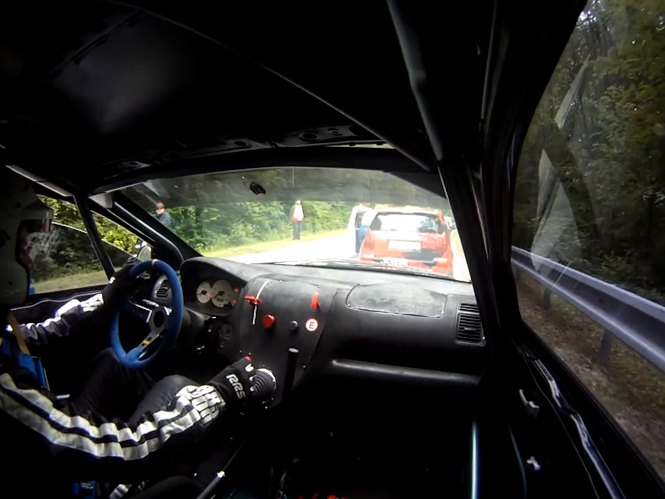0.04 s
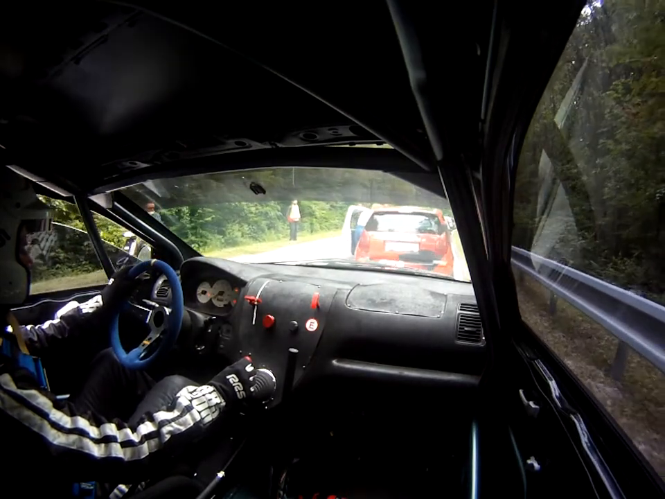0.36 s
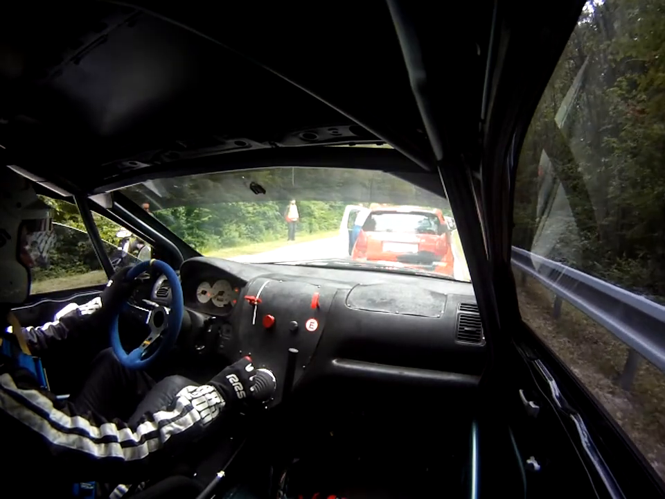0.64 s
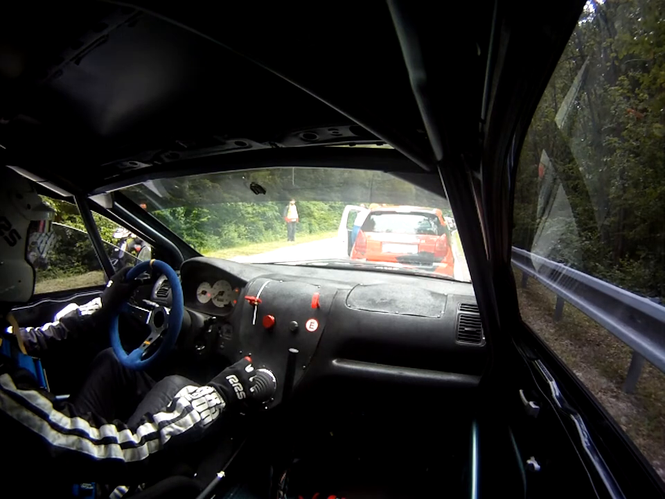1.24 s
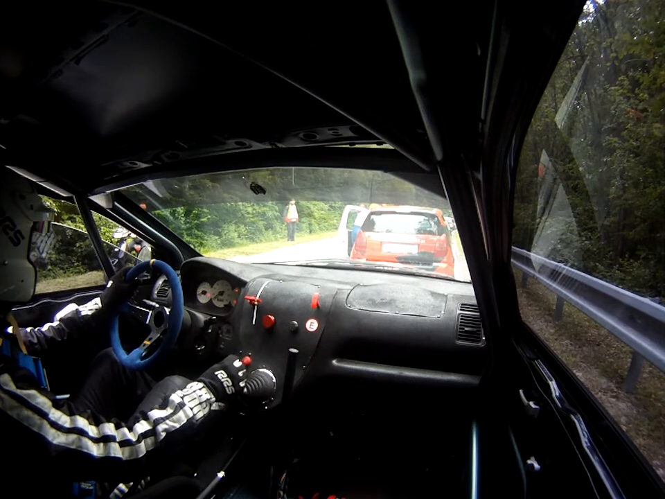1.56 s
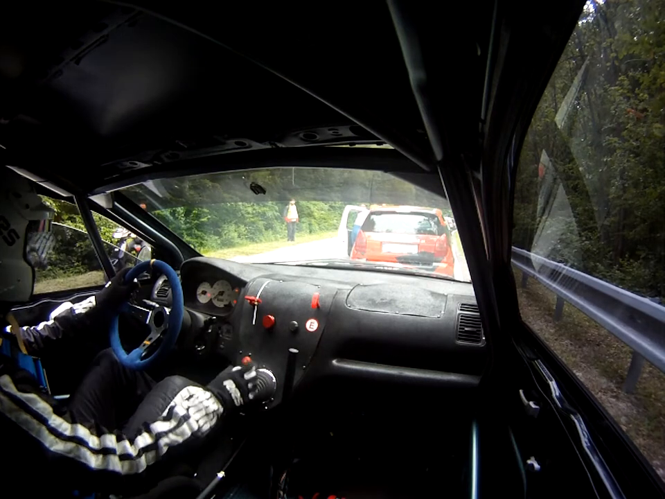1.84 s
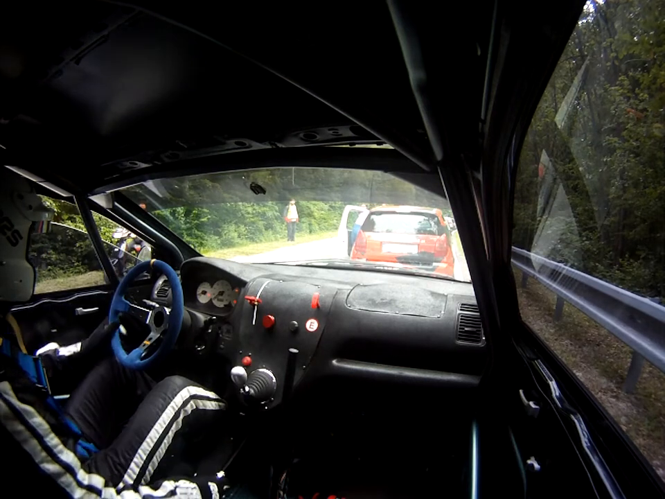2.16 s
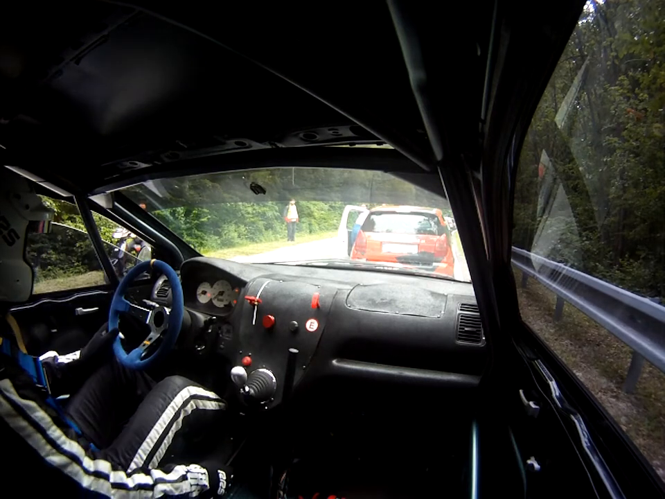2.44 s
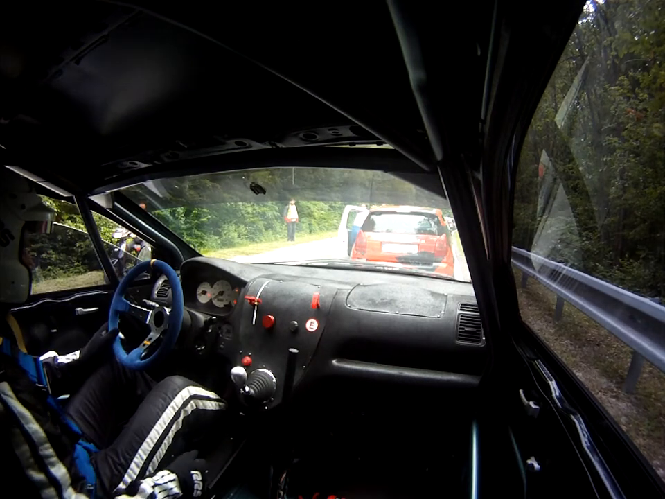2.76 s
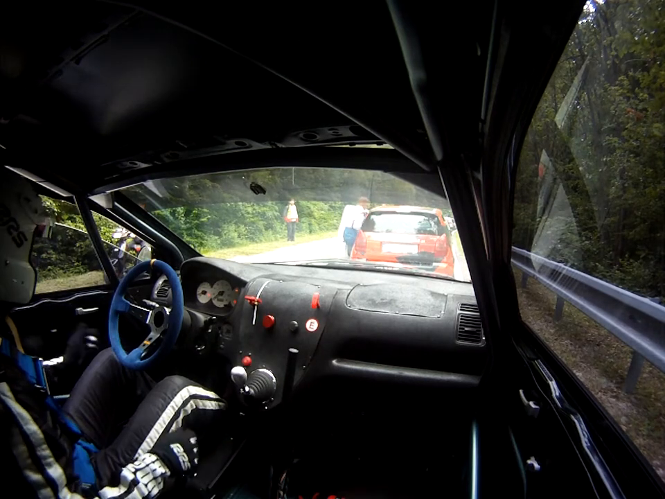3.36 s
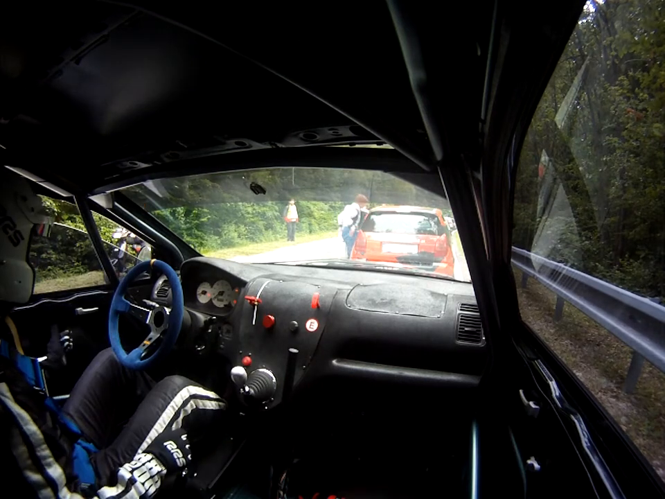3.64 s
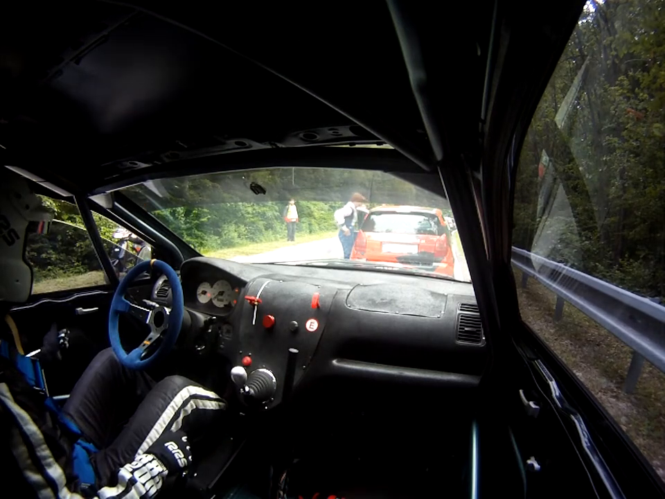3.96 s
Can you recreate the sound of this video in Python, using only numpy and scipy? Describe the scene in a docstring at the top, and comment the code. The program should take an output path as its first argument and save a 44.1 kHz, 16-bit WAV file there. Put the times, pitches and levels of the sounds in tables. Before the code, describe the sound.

A handbrake ratchets up quickly inside a rally car with its engine idling.

```python
"""An idling engine throbs inside a stripped rally car; a fan hums and an exhaust murmurs from up the road.
The driver pulls the handbrake: a pawl drops over fourteen teeth, ringing the lever and floor pan,
and the cable groans. The lever knocks as it is let go, and he shifts in his seat.
The onboard recorder holds each sample of a slow clock, which mirrors the sound into a gritty treble."""
import sys
import numpy as np
from scipy import signal
from scipy.fft import rfft, irfft
from scipy.io import wavfile

SR = 44100
rng = np.random.default_rng(int(sys.argv[2]) if len(sys.argv) > 2 else 0)


def wav_out(sig):
    """Save sig, one row per channel (or a flat mono array), as 16-bit PCM at SR to the path in sys.argv[1]."""
    wavfile.write(sys.argv[1], SR, np.round(np.clip(np.atleast_2d(sig).T, -1, 1) * 32767).astype(np.int16))


N = 176400
T = np.arange(N) / SR

# exhaust murmur, engine clatter (time [s], level [dB])
EXHAUST_LEVEL = [(0, -40.5), (.5, -39), (.95, -39.5), (1.15, -48), (1.32, -50.5), (1.4, -40), (1.56, -48),
                 (2.4, -53.5), (4, -50.5)]
CLATTER_LEVEL = [(0, -51), (.85, -51.5), (1.15, -53), (2.5, -52), (4, -52.5)]
# idle speed (time [s], crank rate [rev/s])
CRANK_SPEED = [(0, 12.86), (1.4, 13.11), (2.2, 13.1), (3.5, 12.87), (4, 13.2)]
# engine tones (order [per rev], level [dB])
ENGINE_ORDERS = [(2, -31.5), (3, -57), (4, -48.5), (8, -50), (10, -57), (14, -53.5), (16, -39.5),
                 (26, -66.5), (44, -61.5)]
# body shell booms (start [s], length [s], level [dB], pitch [Hz])
SHELL_BOOMS = [(0, 0.083, -32.5, 40.6), (0.021, 0.091, -35, 116.7), (0.216, 0.094, -25.5, 32.9),
               (0.314, .1, -32, 46.1), (0.48, 0.13, -29.5, 34.1)]

# swells (start [s], length [s], level [dB])
EXHAUST_BLIPS = [(.72, 0.356, -46), (1.35, 0.152, -40.5)]
CLOTH_RUBS = [(1.475, .05, -54), (2.585, .11, -38.5), (3.54, 0.036, -46.5), (3.61, 0.089, -50.5),
              (3.915, 0.11, -42)]  # sleeve and seat
GEAR_LEVER_SCUFFS = [(1.64, 0.058, -47.5), (1.68, 0.032, -51)]
CABLE_GROANS = [(2.72, 0.12, -33), (2.93, .11, -40.5)]

# impacts (time [s], level [dB])
LIGHT_TICKS = [(1.499, -62), (1.902, -57), (2.599, -53)]
DULL_KNOCKS = [(3.1553, -32), (3.1615, -27), (3.176, -37), (3.94, -46), (3.9675, -37), (3.991, -39)]  # lever, then seat
PAWL_DROPS = [(2.6689, -21.5), (2.6862, -23), (2.703, -22.5), (2.722, -22.5), (2.7422, -21), (2.764, -25),
              (2.7891, -22), (2.8182, -23), (2.8466, -22.5), (2.8753, -22.5), (2.9024, -23), (2.9318, -23),
              (2.9634, -23), (3.0037, -24)]

# noise and impact spectra (frequency [Hz], relative density [dB])
EXHAUST_SPECTRUM = [(90, -2), (150, 1.5), (250, -1), (335, 2.5), (390, -3.5), (510, -0.5), (620, -18.5),
                    (900, -24.5), (2000, -24)]
CLATTER_SPECTRUM = [(500, -3.5), (760, -3), (1000, -6.5), (1230, -1.5), (1530, -5.5), (1900, 1.5),
                    (2250, -1.5), (2850, 2.5), (3400, -7.5), (4150, -16), (4700, -12.5), (5400, -19),
                    (5900, -24)]
RUMBLE_SPECTRUM = [(20, -7), (45, -9), (62, -14), (85, -1), (110, 7.5), (135, 0.5), (165, 0.5),
                   (280, -12.5), (400, -7.5), (560, -2.5), (700, -19), (1000, -42.5)]
RUB_SPECTRUM = [(300, 11), (600, 8.5), (900, -13), (1300, 0), (1900, -4.5), (2700, 4.5), (3600, -6.5),
                (5500, -26)]
SCUFF_SPECTRUM = [(600, 0), (850, -2), (1200, 4), (1700, -8), (2150, 2), (3000, -5), (3600, -9.5),
                  (5500, -30)]
TICK_SPECTRUM = [(1500, -20), (3000, 4), (4500, -2), (5800, -5)]
KNOCK_SPECTRUM = [(50, 6), (120, -2.5), (330, -1), (490, 1), (610, -3.5), (900, -20), (1550, -17.5),
                  (2200, -22), (2650, -14), (3500, -26.5), (5500, -43.5)]
FLOOR_PAN_SPECTRUM = [(100, -5), (165, 2), (280, -13.5), (410, -5), (630, -2), (900, -24), (1340, -15),
                      (1550, 0), (1740, -8), (2200, -4), (2500, 1.5), (3050, -3.5), (3250, -8.5),
                      (3620, -17.5), (3850, -2.5), (4080, -17), (4650, -9.5), (5300, -16), (5900, -26)]

# cabin decay (frequency [Hz], T60 [s])
CABIN_DECAY = [(150, 0.64), (500, 0.33), (1400, .19), (2700, .21), (4000, 0.21)]
# toothed plate and lever modes (frequency [Hz], rms over the pull [dB])
LEVER_RING = [(391, -40), (425, -43), (2348, -39), (2520, -38), (2581, -41), (2640, -38), (3067, -41),
              (3102, -43)]
# pawl modes (frequency [Hz], gain [dB], T60 [s])
PAWL_RING = [(1500, 0, .04), (1590, 6, .05)]

ATTACK_S = .0014
ROOF_ECHO_S, ROOF_ECHO_DB = .0145, -6
FAN_HZ, FAN_DB = 244.1, -36
ORDER_FLUTTER_DB, CLATTER_THROB, RUMBLE_DB = 3.54, 0.083, -47.5
CHATTER_PER_S, CHATTER_DB = 260, -42
PAN_GAIN_DB, PAN_FADE_RAD, SLACK_TILT_DB_PER_OCT = 1, 1.24, 0.67
SOFT_LIMIT, HOLD_HZ, CUTOFF_HZ = .42, 12000, 15350


def from_db(db):
    """Decibels to gain."""
    return 10 ** (np.asarray(db) / 20)


def unit_rms(x):
    """Scale to rms 1."""
    return x / np.sqrt(np.mean(x ** 2) + 1e-20)


def at_hz(points, hz):
    """Read a table on a log-frequency axis."""
    table_hz, values = np.transpose(points)
    return np.interp(np.log(np.maximum(hz, 1)), np.log(table_hz), values)


def gain_curve(points):
    """Gain along (time [s], level [dB]) points."""
    return from_db(np.interp(T, *np.transpose(points)))


def colour(x, spectrum):
    """Minimum-phase filter; falls 24 dB per octave beyond the spectrum's ends."""
    n = len(x)
    hz = np.arange(n // 2 + 1) * SR / n + 1
    skirts = np.minimum(1, np.minimum(hz / spectrum[0][0], spectrum[-1][0] / hz)) ** 4
    cepstrum = irfft(np.log(from_db(at_hz(spectrum, hz)) * skirts), n)
    causal = np.r_[cepstrum[0], 2 * cepstrum[1:n // 2]]
    return irfft(rfft(x) * np.exp(rfft(causal, n)), n)


def noise(spectrum):
    """Coloured noise, rms 1."""
    return unit_rms(colour(rng.standard_normal(N), spectrum))


def drift(corner_hz):
    """Low-passed random drift, mean 0, rms 1."""
    hz = np.arange(N // 2 + 1) * SR / N
    slow = irfft(rfft(rng.standard_normal(N)) / (1 + (hz / corner_hz) ** 2), N)
    return unit_rms(slow - slow.mean())


def wandering_phase(hz, wander, corner_hz):
    """Phase [rad] of a rate that drifts by the rms fraction `wander`."""
    return 2 * np.pi * np.cumsum(hz * (1 + wander * drift(corner_hz))) / SR


def tone(hz, wander, corner_hz=27):
    """Sine of wavering pitch, rms 1."""
    return np.sqrt(2) * np.sin(wandering_phase(hz, wander, corner_hz))


def impulses(rows):
    """One impulse per (time [s], level [dB]) row."""
    time_s, db = np.transpose(rows)
    return np.bincount(np.clip(time_s * SR, 0, N - 1).astype(int), from_db(db), N)


def swells(rows):
    """One half-sine envelope per (start [s], length [s], level [dB]) row."""
    return sum(from_db(db) * np.sin(np.pi * np.clip((T - start_s) / length_s, 0, 1))
               for start_s, length_s, db in rows)


def ring(hz, t60_s, rise_s=ATTACK_S):
    """One mode that builds up and dies away."""
    t = T[:SR // 2]
    return np.sin(2 * np.pi * hz * t) * (1 - np.exp(-t / rise_s)) * np.exp(-np.log(1000) * t / t60_s)


def panel(spectrum, snap_s=.007, snap_db=-1.5):
    """Struck panel in the cabin: a snap, its roof echo and a tail that decays by band."""
    t = T[:SR // 2]
    snap = from_db(snap_db) * np.exp(-(t / snap_s) ** 4)
    echo = from_db(ROOF_ECHO_DB) * np.exp(-((t - ROOF_ECHO_S) / snap_s * 2 - 1) ** 2)
    envelope = (1 + snap + echo) * np.minimum(t / ATTACK_S, 1)
    white = rfft(rng.standard_normal(len(t)))
    hz = np.arange(len(t) // 2 + 1) * SR / len(t)
    edges_hz = np.geomspace(45, 6400, 40)
    bands = 0
    for low, high in zip(edges_hz, edges_hz[1:]):
        band = irfft(white * (hz >= low) * (hz < high), len(t))
        decay = from_db(-60 * t / at_hz(CABIN_DECAY, low))
        bands += unit_rms(band * envelope * decay) * np.sqrt(high - low)
    return unit_rms(colour(bands, spectrum)) * np.sqrt(.03 * SR / len(t))  # energy of 30 ms at rms 1


def strike(hits, response):
    """Play impulses through a body's response."""
    return signal.fftconvolve(hits, response)[:N]


def far_exhaust():
    """Exhaust up the road: a murmur with two droning blips."""
    murmur = gain_curve(EXHAUST_LEVEL) * noise(EXHAUST_SPECTRUM)
    return murmur + swells(EXHAUST_BLIPS) * tone(hz=337, wander=0.072)


def fan():
    """Steady blade tone of an electric fan."""
    return tone(FAN_HZ, wander=0.00035, corner_hz=4) * from_db(FAN_DB + 0.13 * drift(1))


def engine():
    """Crank orders over rumble and shell boom; the clatter throbs at each firing, two per rev."""
    rev_per_s = np.interp(T, *np.transpose(CRANK_SPEED))
    crank_rad = wandering_phase(rev_per_s, wander=0.0062, corner_hz=2.7)
    tones = 0
    for order, db in ENGINE_ORDERS:
        flutter_db = ORDER_FLUTTER_DB * min(order / 10, 1) * drift(2.2)
        phase_rad = order * crank_rad + 2 * np.pi * rng.random()
        tones += from_db(db + flutter_db) * np.sqrt(2) * np.sin(phase_rad)
    throb = 1 + CLATTER_THROB * np.sin(2 * crank_rad)
    clatter = gain_curve(CLATTER_LEVEL) * noise(CLATTER_SPECTRUM) * throb
    booms = sum(swells([swell]) * tone(hz, wander=0.1) for *swell, hz in SHELL_BOOMS)
    rumble = from_db(RUMBLE_DB) * noise(RUMBLE_SPECTRUM)
    return tones + clatter + rumble + booms


def driver():
    """Hollow knocks of lever and seat, faint ticks, rubbing cloth and a hand scuffing the gear lever."""
    hollow = from_db(15) * ring(hz=485, t60_s=.045, rise_s=.006)
    knocks = strike(impulses(DULL_KNOCKS), panel(KNOCK_SPECTRUM, snap_s=.01, snap_db=1) + hollow)
    ticks = strike(impulses(LIGHT_TICKS), panel(TICK_SPECTRUM))
    rubs = swells(CLOTH_RUBS) * noise(RUB_SPECTRUM)
    scuffs = swells(GEAR_LEVER_SCUFFS) * noise(SCUFF_SPECTRUM)
    roughness = from_db(1.8 * drift(66))
    return knocks + ticks + (rubs + scuffs) * roughness


def floor_pan(hits, travel):
    """Dense ring under the lever; shifts and darkens as travel (0 to 1) takes up the cable's slack."""
    slack_spectrum = [(hz, db + SLACK_TILT_DB_PER_OCT * np.log2(hz)) for hz, db in FLOOR_PAN_SPECTRUM]
    slack = strike(hits * np.cos(PAN_FADE_RAD * travel), panel(slack_spectrum))
    taut = strike(hits * np.sin(PAN_FADE_RAD * travel), panel(FLOOR_PAN_SPECTRUM))
    return from_db(PAN_GAIN_DB) * (slack + taut)


def handbrake():
    """Tooth drops and the chatter between them ring pawl, lever and pan; the cable groans taking up."""
    start_s = PAWL_DROPS[0][0]
    pull_s = PAWL_DROPS[-1][0] - start_s
    travel = np.clip((T - start_s) / pull_s, 0, 1)
    pulling = (travel > 0) * (travel < 1)
    chatter = pulling * (rng.random(N) < CHATTER_PER_S / SR) * rng.standard_normal(N)
    hits = impulses(PAWL_DROPS) + from_db(CHATTER_DB) * chatter
    pan = floor_pan(hits, travel)
    lever = sum((-1) ** k * from_db(db) * unit_rms(strike(hits, ring(hz, t60_s=.18)))
                for k, (hz, db) in enumerate(LEVER_RING))
    lever *= np.sqrt(pull_s * SR / N)  # refer the rms to the pull
    pawl = strike(hits, sum(from_db(db) * ring(hz, t60_s) for hz, db, t60_s in PAWL_RING))
    cable = swells(CABLE_GROANS) * tone(hz=164.1, wander=0.08)
    return pan + lever + pawl + cable


def scene():
    """Mono mix between the seats."""
    return (far_exhaust() + handbrake() + driver() + engine() + fan())[None]


def record(dry):
    """Soft clip, sample-and-hold, low-pass; the held steps mirror the sound into the treble."""
    rounded = SOFT_LIMIT * np.tanh(dry / SOFT_LIMIT)
    slow = signal.resample_poly(rounded, HOLD_HZ, SR, axis=-1)
    held = signal.resample(np.repeat(slow, 8, axis=-1), N, axis=-1)
    lowpass = signal.ellip(12, .2, 80, CUTOFF_HZ, fs=SR, output="sos")
    return signal.sosfilt(lowpass, held)


dry = scene()
out = record(dry)
wav_out(out)
```